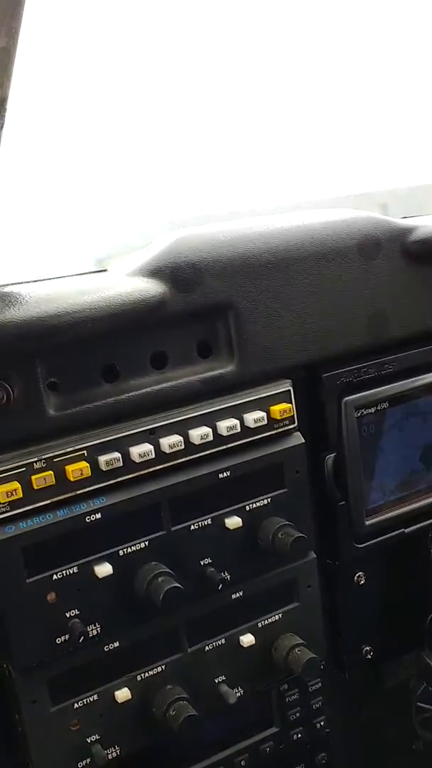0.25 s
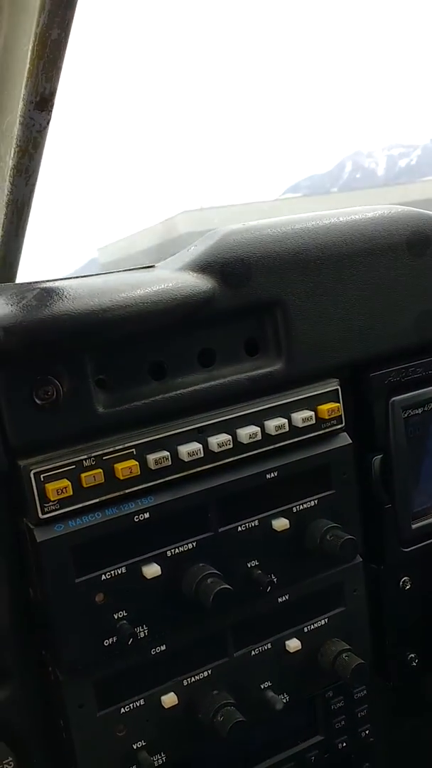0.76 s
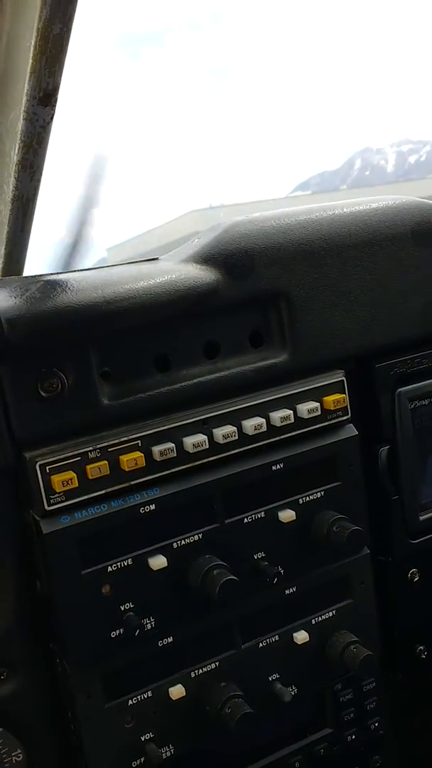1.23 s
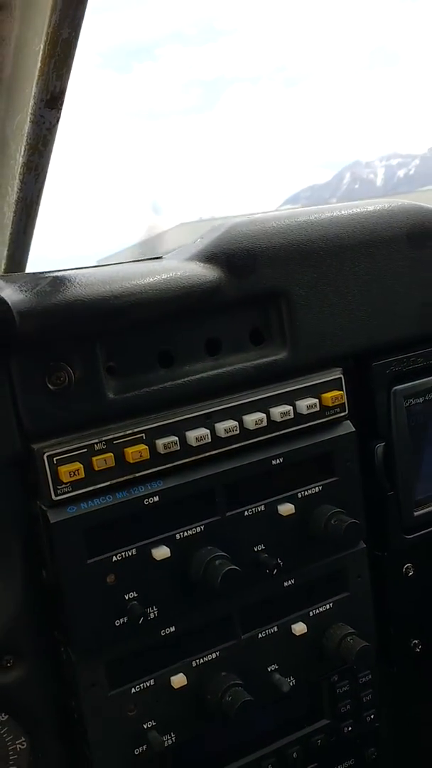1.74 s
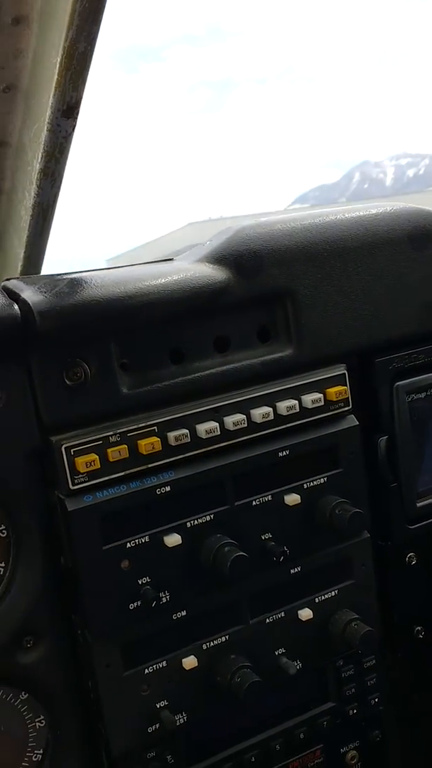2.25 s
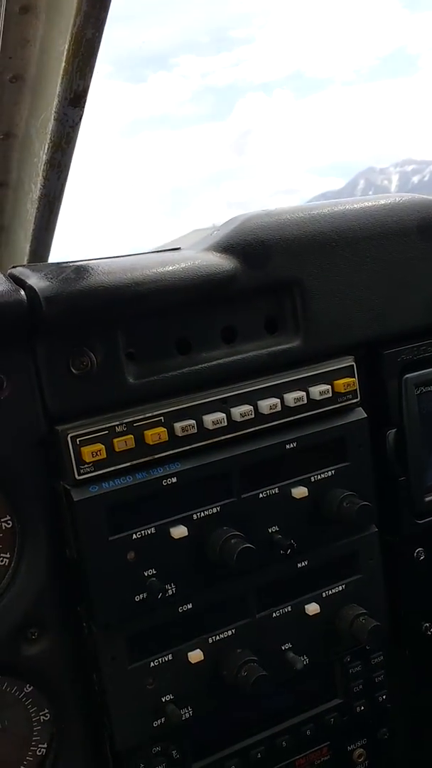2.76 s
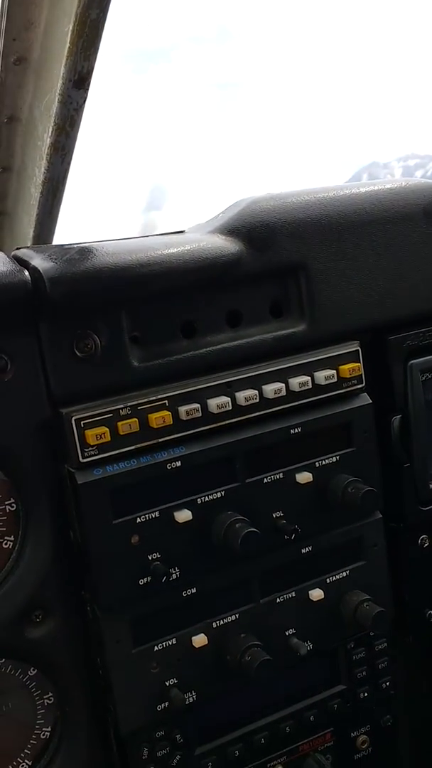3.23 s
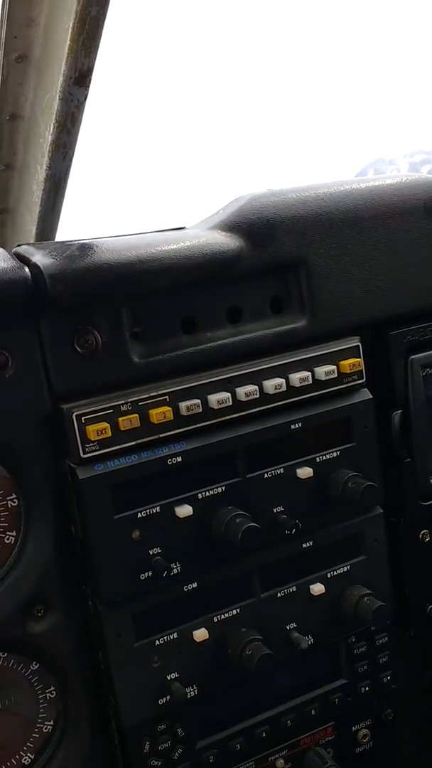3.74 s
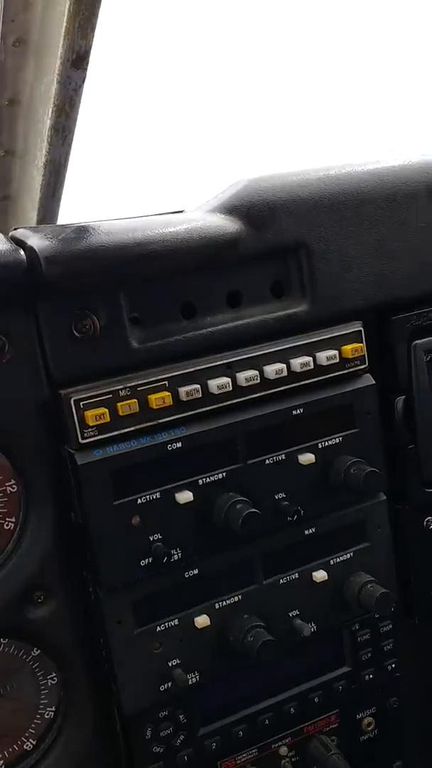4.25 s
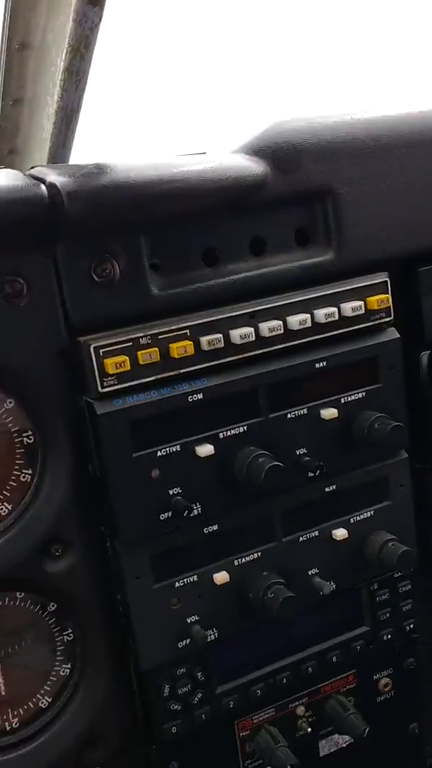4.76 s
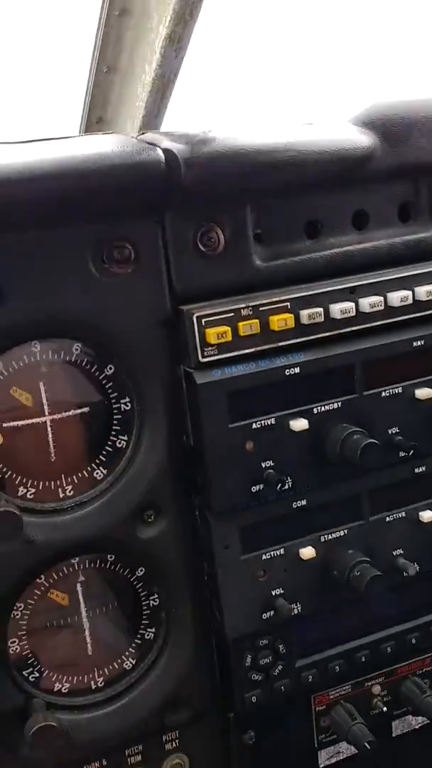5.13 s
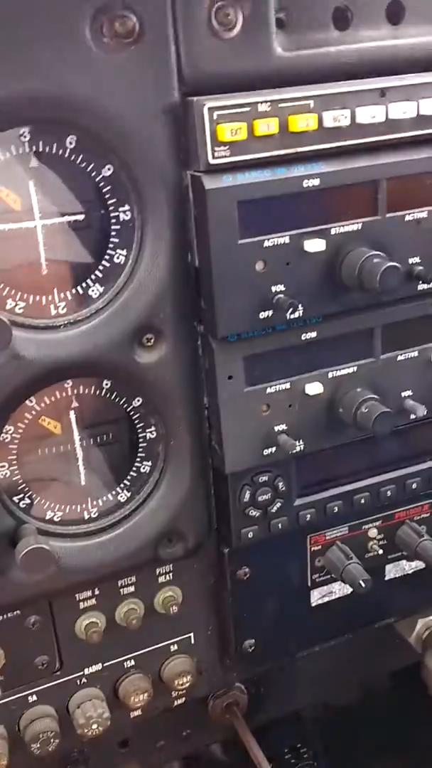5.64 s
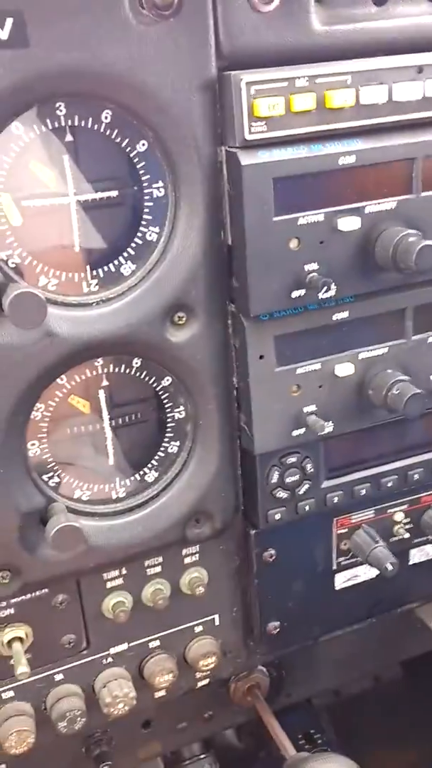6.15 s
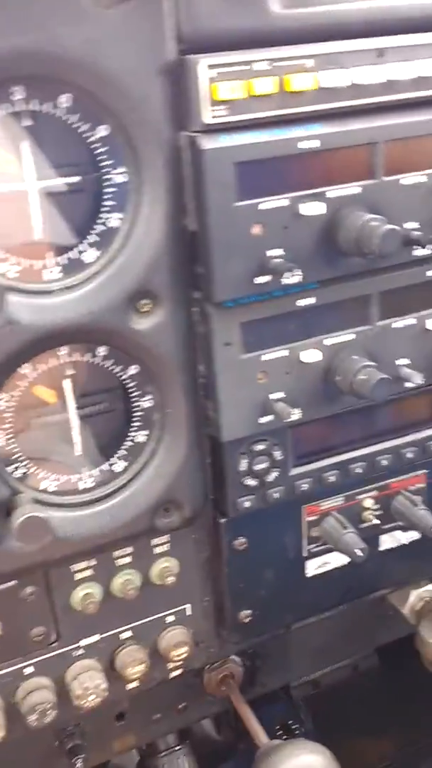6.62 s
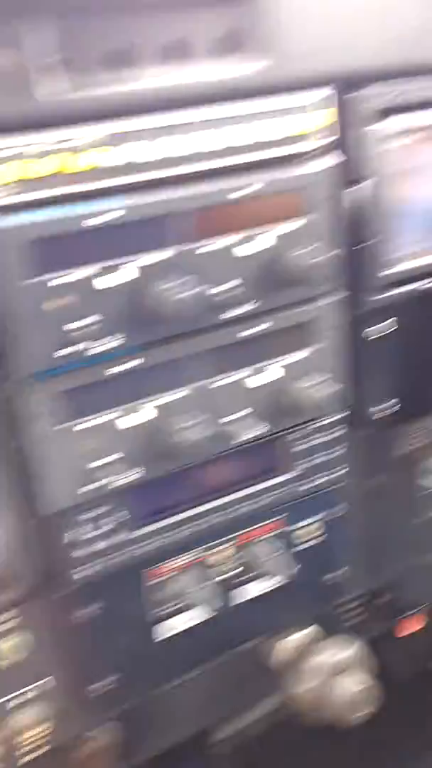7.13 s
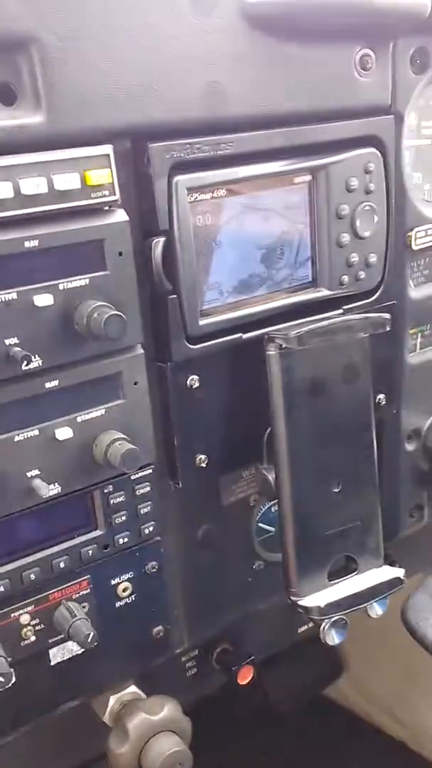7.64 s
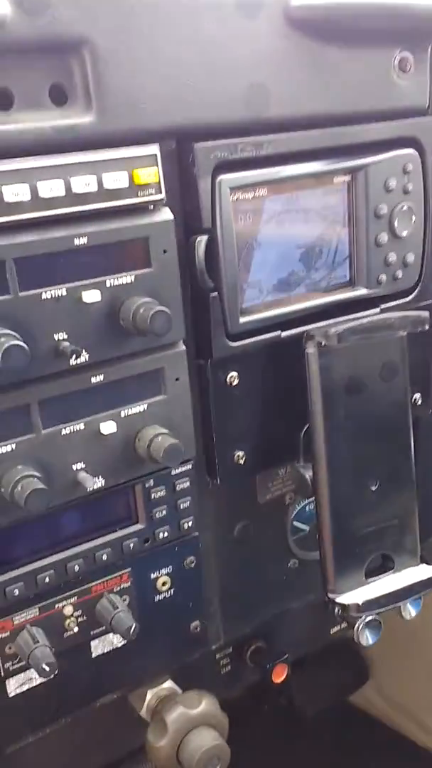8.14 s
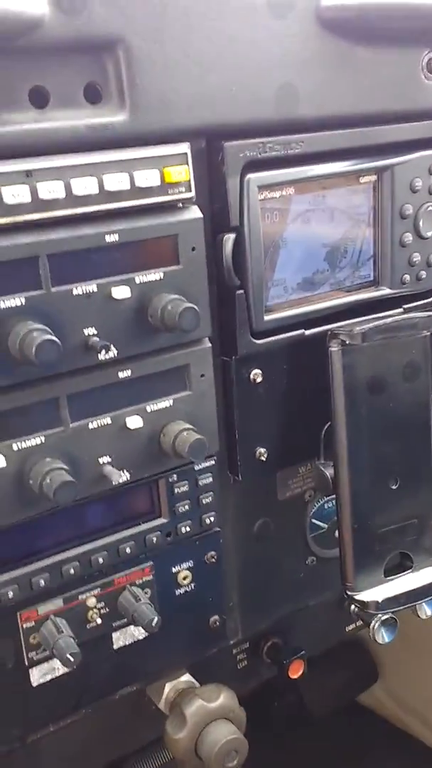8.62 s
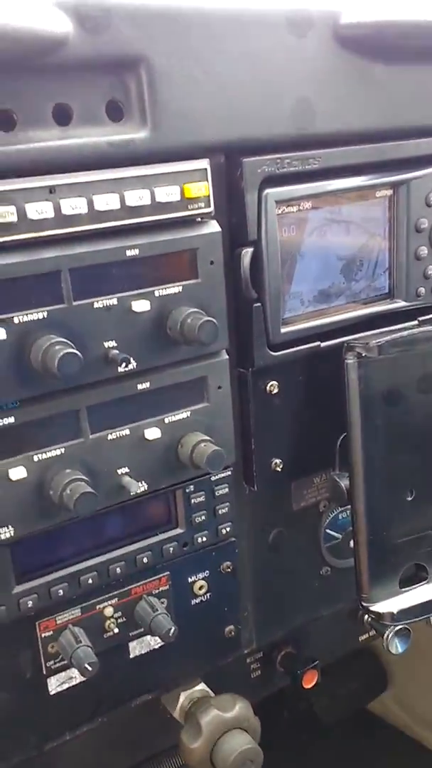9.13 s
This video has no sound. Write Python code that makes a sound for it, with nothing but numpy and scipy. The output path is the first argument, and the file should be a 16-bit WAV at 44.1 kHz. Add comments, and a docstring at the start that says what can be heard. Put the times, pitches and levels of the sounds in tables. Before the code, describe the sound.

From 0 to about 9.4 seconds a six-cylinder piston engine idles continuously at roughly 1240 rpm, heard inside a small cockpit. A low thrum, strongest from about 125 to 210 Hz, lies under rough, lopsided clatter repeating about ten times a second, with hollow midrange panel resonance. The speed hunts and sags slightly. Clatter starts a little softer, is fullest around 5.6, and eases towards the end; brief dips come near 3.2, 3.6, 6.5 and 8.5. The drone swells near 1, 4, 5.6 and 7 as the hand-held stereo microphone moves. A faint flickering whine rises slowly beside a fixed thin tone and wavering hiss, clearer later. Light finger rubs and ticks occur near 0.5, 0.9, 4, 5.7 to 6.1, 6.8, 7.8, 8.6 and 9.3; one distinct sharp click sounds at 7.17.

```python
"""A light aircraft's six-cylinder engine idles at about 1240 rpm, heard in the cockpit by a hand-held stereo microphone.
Cosines at multiples of the four-stroke cycle rate make the cabin thrum; noise gated by knocks makes a lopsided clatter.
Panel resonances colour both and change as the hand moves. Sines make a faint gyro whine, rising in pitch, and an
avionics tone; stuttering noise and decaying modes make fingers rub and click on the case, over a wavering hiss."""
import sys
import numpy as np
from scipy import signal
from scipy.fft import rfft, irfft, next_fast_len
from scipy.io import wavfile
from scipy.ndimage import uniform_filter1d

SR = 44100
rng = np.random.default_rng(int(sys.argv[2]) if len(sys.argv) > 2 else 0)


def transcribe(u):
    """Save the signal u as a 16-bit wav file named by the first command-line argument.

    u: samples, shape (n,) or (channels, n), limited to [-1, 1]; the rate is SR.
    q: integer samples, one column per channel.
    """
    v = np.clip(np.atleast_2d(u).T, -1, 1)
    q = np.round(v * 32767).astype(np.int16)
    wavfile.write(sys.argv[1], SR, q)


N = 413658
TIME = np.arange(N) / SR
SIZE = next_fast_len(N + 4096)
FREQ = np.maximum(np.arange(SIZE // 2 + 1) * SR / SIZE, 1)
WANDER_PER_S = 4.6

# engine speed, sagging and hunting: t/s, four-stroke cycle rate/Hz
ENGINE_SPEED = [(0.0, 10.52), (0.5, 10.465), (0.9, 10.391), (1.4, 10.463), (2.2, 10.402), (2.6, 10.368),
                (3.3, 10.429), (3.7, 10.251), (4.1, 10.372), (5.2, 10.245), (5.6, 10.34), (6.1, 10.266),
                (6.55, 10.211), (7.3, 10.39), (7.8, 10.224), (8.6, 10.228), (9.0, 10.318), (9.38, 10.261)]
# microphone path: t/s, place/index (0 glare shield, 1 pillar, 2 radios, 3 dials, 4 switches, 5 map display)
MIC_PATH = [(0, 0), (1.1, 0), (1.7, 1), (3.3, 1), (3.8, 2), (4.6, 2), (5.15, 3), (5.65, 3), (5.9, 4),
            (6.45, 4), (6.7, 3), (7.15, 3), (7.45, 5), (9.4, 5)]
# knocks of each cycle: place/cycle, decay/cycle, lowest f/Hz, highest f/Hz, level/dB, gain from place 0 to 5/dB
KNOCKS_PER_CYCLE = [(.10, .035, 550, 1000, 3.5, -4), (.18, .07, 550, 1800, 2, -3),
                    (.24, .03, 90, 1000, 1, 0), (.275, .04, 1000, 3500, -1, 4),
                    (.57, .05, 280, 1800, 1.5, -1), (.66, .06, 550, 3500, 0, 2),
                    (.765, .06, 90, 3500, 4, 0), (.835, .04, 550, 1800, 0, 0),
                    (.91, .05, 4000, 9000, 2.5, 0)]


def from_db(db):
    """Decibels to gain."""
    return 10 ** (np.asarray(db) / 20)


def rms_one(x):
    """Scale to rms 1."""
    return x / np.sqrt(np.mean(x ** 2) + 1e-20)


def in_time(rows):
    """Each column of a curve table at every sample."""
    s, *columns = np.transpose(rows)
    return [np.interp(TIME, s, c) for c in columns]


def at_hz(points, hz):
    """Read a spectrum on a log-frequency axis."""
    f_hz, value = np.transpose(points)
    return np.interp(np.log(hz), np.log(f_hz), value)


def at_place(levels_db):
    """Level through time, interpolated between the microphone places."""
    return np.interp(in_time(MIC_PATH)[0], np.arange(len(levels_db)), levels_db)


def drift(knots_per_s):
    """Random curve: straight lines between knots of spread 1."""
    knots = rng.standard_normal(400)
    return np.interp(TIME * knots_per_s, np.arange(len(knots)), knots)


def white():
    """Spectrum of fresh white noise."""
    return rfft(rng.standard_normal(SIZE))


def to_time(spectrum):
    """Spectrum back to samples."""
    return irfft(spectrum, SIZE)[..., :N]


def resonance(x, hz, width_hz):
    """Two-pole band-pass with gain about 1 on top."""
    r = np.exp(-np.pi * width_hz / SR)
    b = np.array([1, 0, -1]) * (1 - r * r) / 2
    a = [1, -2 * r * np.cos(2 * np.pi * hz / SR), r * r]
    return signal.lfilter(b, a, x)


def stereo(direct, diffuse):
    """Two spectra to left and right; in the treble the left channel is late and inverted."""
    # left-right likeness: f/Hz, correlation
    likeness = [(60, .5), (150, .4), (280, .2), (450, .55), (800, .96), (1500, .9), (3000, .94),
                (6000, .91), (12000, .85)]
    # left minus right: f/Hz, level/dB
    balance = [(60, -3), (150, 1), (300, -0.5), (500, 0.5), (620, 2.5), (900, -0.5), (1200, 0.5),
               (1480, -4.5), (1800, 0), (3000, 0)]
    alike = np.clip(at_hz(likeness, FREQ), 0, .99)
    common = np.sqrt((1 + alike) / 2) * direct
    opposed = np.sqrt((1 - alike) / 2) * diffuse
    lag_s = .000562
    turn_rad = np.maximum(2 * np.pi * FREQ * lag_s - np.pi, .4 * (FREQ > 500))
    tilt = from_db(at_hz(balance, FREQ) / 2)
    left = (common + opposed) * tilt * np.exp(-1j * turn_rad)
    right = (common - opposed) / tilt
    return np.array([left, right])


def thrum(cycle, drone_db):
    """Engine orders phased by six uneven thumps; levels follow the hand and the left side lags in phase."""
    # exhaust thumps, one per cylinder, setting phase only: place/cycle, weight/dB
    thumps = [(.112, -6), (.245, -1), (.488, -4), (.686, -7), (.863, -2), (.978, -7)]
    # engine orders: multiple of the cycle rate, left minus right/dB, base level at places 0-5/dB (six columns)
    orders = [(4, 0, -54, -54, -54, -54, -54, -54), (6, -1.5, -37.2, -37.2, -37.2, -37.2, -37.2, -37.2),
              (8, 0, -49, -54, -56, -51, -52, -58), (9, 1, -52, -50, -50, -52, -52, -54),
              (10, 3, -55, -55, -51, -49, -49, -48), (11, -3, -50, -53, -51, -51, -51, -51),
              (12, -6, -35, -42.5, -41, -39.5, -46, -45.5), (13, -3, -39.5, -41.5, -40, -41.5, -44, -41.5),
              (14, -1, -46, -46, -45, -48, -48, -46), (15, 0, -45, -47, -42, -42.5, -45, -42),
              (16, 0, -35.5, -36, -38, -37, -38, -41), (18, -4, -43.5, -40, -42.5, -43, -43, -44.5),
              (20, -2.5, -38, -40.5, -38.5, -37.2, -38, -37.8), (22, -10, -57, -61, -54, -55, -55, -54),
              (24, 4.5, -43, -43, -41.5, -50, -42.5, -45), (28, -5.5, -41, -41.5, -47, -50, -50, -49.5),
              (32, 6.5, -49, -52, -50, -47.5, -47.5, -47), (36, 0, -52, -54, -55, -57, -57, -56),
              (40, 0, -58, -52, -54, -55, -55, -51), (43, 0, -58, -55, -60, -54, -54, -58),
              (44, 0, -58, -50, -61, -57, -53, -57), (47, 0, -52, -56, -55, -60, -58, -58),
              (48, -4, -53, -43.5, -50, -50, -42, -49), (58, 0, -51, -53, -49, -48, -59, -60),
              (60, 3, -48, -50, -54, -62, -62, -65), (91, 0, -58, -60, -54, -57, -56, -58),
              (92, 0, -64, -62, -55, -53, -55, -54), (120, 0, -61, -60, -56, -53, -57, -56)]
    place, thump_db = np.transpose(thumps)
    late_rad = np.array([[.25], [-.25]])
    out = np.zeros((2, N))
    for order, pan_db, *levels_db in orders:
        hz = order * ENGINE_SPEED[0][1]
        timing_rad = np.angle(np.sum(from_db(thump_db) * np.exp(-2j * np.pi * order * place)))
        swell_db = drone_db * np.interp(hz, [150, 170, 195, 208, 240], [0, .4, .4, 1.8, 0])
        waver_db = drift(4) * np.interp(hz, [70, 120, 500], [.3, .8, 1.5])
        gain = np.sqrt(2) * from_db(at_place(levels_db) + swell_db + waver_db)
        line = gain * np.cos(2 * np.pi * order * cycle + timing_rad - late_rad)
        out += line * from_db([[pan_db / 2], [-pan_db / 2]])
    return out


def shaking(cycle, slaps):
    """White excitation: part fresh, part a loosely timed pattern that repeats every cycle and slowly changes."""
    # repeating part of the clatter: f/Hz, share of power
    repeat = [(40, .01), (200, .05), (350, .2), (700, .41), (1400, .3), (2300, .23), (4000, .01)]
    jitter_cycles, jitter_per_s, pattern_changes_per_s = .0013, 8, .9
    patterns = irfft(np.exp(2j * np.pi * rng.random((16, 2049))))
    jittered = cycle + jitter_cycles * drift(jitter_per_s)
    step = (jittered % 1 * patterns.shape[1]).astype(int)
    blend, which = np.modf(TIME * pattern_changes_per_s)
    which = which.astype(int)
    old, new = patterns[which, step], patterns[which + 1, step]
    same = rms_one(old * np.cos(blend * np.pi / 2) + new * np.sin(blend * np.pi / 2)) + slaps
    share = np.clip(at_hz(repeat, FREQ), 0, .9)
    return np.sqrt(share) * rfft(same, SIZE) + np.sqrt(1 - share) * white()


def piston_slaps(cycle, spread_db, dull_hz):
    """Low-passed impulses: three uneven slaps a cycle, and a few stronger impulses at set times."""
    # slaps of each cycle, before dulling: place/cycle, mid level re steady shaking/dB
    slap_places = [(.105, 6), (.575, 5), (.77, 9)]
    # a few stronger impulses, before dulling: t/s, level re steady shaking/dB
    strong_impulses = [(.301, 28), (1.887, 23), (2.753, 23), (3.118, 30), (4.523, 31), (6.341, 22),
                       (7.299, 31), (7.829, 32)]
    impulses = np.zeros(N)
    for place, level_db in slap_places:
        at = np.flatnonzero(np.diff(np.floor(cycle - place)))
        uneven_db = spread_db * np.clip(rng.standard_normal(len(at)), -2, 1.5)
        impulses[at] = from_db(level_db + uneven_db)
    for s, impulse_db in strong_impulses:
        impulses[round(s * SR)] += from_db(impulse_db)
    low_pass = signal.butter(2, dull_hz, fs=SR, output="sos")
    return signal.sosfilt(low_pass, 1e-18 - impulses)  # tiny offset avoids denormals


def knock_bursts(cycle):
    """Power of each knock through time: quick rise, usually slower fall, new strength every cycle."""
    attack_cycles, uneven_spread_db = .022, .8
    moved = in_time(MIC_PATH)[0] / MIC_PATH[-1][1] - .5
    bursts = []
    for place, decay_cycles, _, _, level_db, move_db in KNOCKS_PER_CYCLE:
        turn = np.round(cycle - place)
        age = cycle - place - turn
        uneven_db = uneven_spread_db * rng.standard_normal(128)[turn.astype(int)]
        fade = np.where(age < 0, (age / attack_cycles) ** 2, age / decay_cycles)
        peak = from_db(level_db + move_db * moved + uneven_db) ** 2
        bursts.append(peak * np.exp(-np.minimum(fade, 20)))
    return bursts


def knock_gate(bursts, band_hz):
    """Gain of one band, lifted by every knock that reaches it; rms 1."""
    # knock level over the steady clatter, added to each knock's own: f/Hz, level/dB
    knock_colour = [(150, -8), (380, -4), (780, -2), (1350, 2), (2500, -7.5)]
    power = sum(burst for burst, (_, _, low_hz, high_hz, *_) in zip(bursts, KNOCKS_PER_CYCLE)
                if low_hz < band_hz < high_hz)
    return rms_one(np.sqrt(1 + power * from_db(at_hz(knock_colour, band_hz)) ** 2))


def clatter(cycle, boom_db, clatter_db):
    """Combustion and valve noise, coloured by the cabin and pulsed in bands by the knocks."""
    # engine noise in the cabin, before swells and panels: f/Hz, density/dB per Hz
    cabin = [(25, -89), (50, -65), (80, -61), (150, -52), (230, -59.5), (340, -59), (500, -62.5),
             (900, -61.5), (1450, -65.5), (1800, -67.5), (2700, -79), (4000, -81), (6000, -90), (9000, -99),
             (15000, -99)]
    # band centres: f/Hz
    band_centres_hz = [120, 190, 380, 780, 1350, 2500, 6000]
    slaps = piston_slaps(cycle, spread_db=3, dull_hz=1710)
    bursts = knock_bursts(cycle)
    sound = stereo(shaking(cycle, slaps), shaking(cycle, 0))
    sound = sound * from_db(at_hz(cabin, FREQ)) * np.sqrt(SR / 2)
    top_db = .5 * clatter_db + .5 * drift(3.4)
    swells_db = [.5 * boom_db, 0, 0, clatter_db, clatter_db, .5 * clatter_db, top_db]
    out = np.zeros((2, N))
    for hz, only, swell_db in zip(band_centres_hz, np.eye(len(swells_db)), swells_db):
        band = to_time(sound * np.interp(np.log(FREQ), np.log(band_centres_hz), only))
        out += band * from_db(swell_db) * knock_gate(bursts, hz)
    return out


def panels(x):
    """Panel resonances in series, each raised or cut according to the microphone place."""
    # panel modes: f/Hz, width/Hz, gain at places 0-5/dB (six columns)
    panel_modes = [(455, 88, 2.5, 4.5, 4, 6, 5.5, 7), (498, 32, 2, 1, 0.5, -1.5, -4.5, -3.5),
                   (544, 39, 4.5, 2.5, 1, 0.5, -4, -0.5), (624, 46, 8.5, 7, 7, 3, 5.5, 6.5),
                   (782, 120, 8.5, 7, 7, 7.5, 7, 8), (941, 30.6, 7.5, 8.5, 8.5, 5, 5, 7),
                   (1013, 36, -1, -15, -9, -7, -6, 6.5), (1091, 100, 3.5, 2.5, 1.5, 5, 5, 1),
                   (1234.5, 45, 7.5, 6.5, 8, 7.5, 8, 7.5), (1451, 99, 9.5, 9.5, 8.5, 5, 3, 6.5),
                   (2216, 128, 6.5, 6.5, 5.5, 5, 4.5, 5.5)]
    for hz, width_hz, *levels_db in panel_modes:
        x = x + (from_db(at_place(levels_db)) - 1) * resonance(x, hz, width_hz)
    return x


def instruments():
    """Flickering sines: a gyro whine gliding up with its octave, and an avionics tone of fixed pitch."""
    # base levels before flicker and nearness: gyro, its octave, avionics/dB rms
    tones_db = (-63, -68, -68)
    gyro_start_hz, gyro_rise_hz_per_s, inverter_hz = 3290, 58, 4268
    turns = np.cumsum(gyro_start_hz + gyro_rise_hz_per_s * TIME) / SR
    nearer = from_db(np.interp(TIME, [4, 7.5, 8.6], [-5, -1.5, .5]))
    tones = np.zeros(N)
    for phase, db in zip([turns, 2 * turns, inverter_hz * TIME], tones_db):
        tones += np.sqrt(2) * from_db(db + 4.9 * drift(8.9)) * np.sin(2 * np.pi * phase)
    return nearer * tones


def finger_rubs(grain_db, stutter_db):
    """Skin sliding over the case: grainy, stuttering coloured noise, over a steady, wavering hiss."""
    # rubs, before hiss and stutter: t/s, Gaussian half length/s, level/dB
    slides = [(0.53, 0.077, -57), (0.963, 0.039, -53), (2.48, 0.036, -64), (5.68, 0.044, -60),
              (9.35, .06, -58), (3.99, 0.02, -54), (5.88, 0.13, -59), (6.126, 0.026, -52),
              (6.82, 0.05, -50.5), (7.79, 0.048, -55), (8.567, 0.12, -50)]
    # spectrum of rubs and hiss, relative: f/Hz, density/dB per Hz
    rub_colour = [(1500, -14), (3500, 4.5), (5500, 13), (7500, 3.5), (11000, 3.5), (15000, -15)]
    hiss_db, hiss_spread_db, hiss_wavers_per_s = -57.5, 2.2, 12
    pressure = sum(from_db(db) * np.exp(-((TIME - s) / half_length_s) ** 2 / 2)
                   for s, half_length_s, db in slides)
    hiss_floor = from_db(hiss_db + hiss_spread_db * drift(hiss_wavers_per_s))
    level = (pressure + hiss_floor) * from_db(stutter_db * drift(35))
    grains = from_db(grain_db * rms_one(uniform_filter1d(rng.standard_normal(N), size=90)))
    noise = to_time(white() * from_db(at_hz(rub_colour, FREQ)))
    return level * rms_one(grains * noise)


def case_clicks():
    """Case modes ring briefly at each click and at its two weaker rebounds."""
    # clicks: t/s, gain on the summed modes/dB
    click_times = [(.471, -38.5), (.5606, -42), (.868, -45), (.941, -37), (2.7945, -44), (3.851, -43),
                   (3.982, -41), (6.84, -43), (7.1725, -24.5), (7.734, -41), (8.32, -45)]
    # case modes: f/Hz, mean level/dB, t60/s
    case_modes = [(2570, -4, .007), (3200, -5, .007), (3900, -6, .006), (4600, -2, .007), (5400, -2, .005),
                  (6450, 8, .005), (7300, -2, .004), (8400, -8, .003), (9900, 0, .003), (11700, -8, .003),
                  (13300, -5, .003), (15000, -3, .003)]
    rebound_s, rebound_loss_db, attack_s = .0053, 7, .0003
    out, age_s = np.zeros(N), TIME[:SR // 50]
    for s, level_db in click_times:
        for touch in range(3):
            ring = np.zeros(len(age_s))
            for hz, db, t60_s in case_modes:
                mode_gain = from_db(db + rng.normal(0, 1) - 60 * age_s / t60_s)
                ring += mode_gain * np.sin(2 * np.pi * (hz * age_s + rng.random()))
            start = round((s + touch * rebound_s) * SR)
            gain = from_db(level_db - touch * rebound_loss_db)
            out[start:start + len(age_s)] += gain * ring * np.minimum(age_s / attack_s, 1)
    return out


def stumbles():
    """Engine gain: now and then the level dips briefly, along a Gaussian in dB."""
    # dips: t/s, half length/s, depth/dB
    dips = [(3.23, .05, -3.5), (3.6, .04, -2), (4.83, .04, -1.2), (6.5, .035, -2), (8.5, .04, -2)]
    return from_db(sum(db * np.exp(-((TIME - s) / half_length_s) ** 2) for s, half_length_s, db in dips))


def scene():
    """Engine thrum and clatter through the panels, with the small near sounds on top."""
    # cabin boom near 125 Hz, halved in the clatter: level at places 0-5/dB
    boom_places_db = (-1, -2.5, -1.5, 0.5, -1, -1.5)
    # drone near 200 Hz as the hand crosses a standing wave, scaled per order: t/s, level/dB
    drone = [(0, -1), (.9, 2.2), (1.3, -4.5), (3.2, -1.5), (3.95, 2.8), (4.5, 1), (5.65, 3), (5.9, -4),
             (6.45, -3), (6.7, 2), (7.2, 2.2), (7.5, -3), (8.25, -1.8), (9.38, -3.8)]
    # clatter level, before wander and band weights: t/s, level/dB
    clatter_curve = [(0, -6), (.33, -0.5), (.52, -2), (1.4, 0), (2.1, 0), (2.5, 0.4), (3.1, 0.1),
                     (3.95, 0.3), (4.35, -.8), (5.0, 1), (5.65, 2.2), (6.4, -0.5), (6.85, 0.1),
                     (7.15, -2.5), (7.4, -0.5), (7.7, -1.5), (7.82, 0.5), (7.97, -1.5), (8.65, -0.7),
                     (8.8, -1.5), (9.0, -2.2), (9.38, -2)]
    speed_hz, = in_time(ENGINE_SPEED)
    cycle = .054 + np.cumsum(speed_hz) / SR
    boom_db = at_place(boom_places_db) - .3 * drift(WANDER_PER_S)
    drone_db, = in_time(drone)
    clatter_db = in_time(clatter_curve)[0] + 1.43 * drift(WANDER_PER_S)
    raw_engine = thrum(cycle, drone_db) + clatter(cycle, boom_db, clatter_db)
    engine = stumbles() * panels(raw_engine)
    near = instruments() + finger_rubs(grain_db=4, stutter_db=2.1) + case_clicks()
    return engine + to_time(stereo(rfft(near, SIZE), 0))


def record(dry):
    """Steep elliptic low-pass at 15.5 kHz."""
    low_pass = signal.ellip(10, .1, 80, 15500, fs=SR, output="sos")
    return signal.sosfilt(low_pass, dry)


dry = scene()
out = record(dry)
transcribe(out)
```